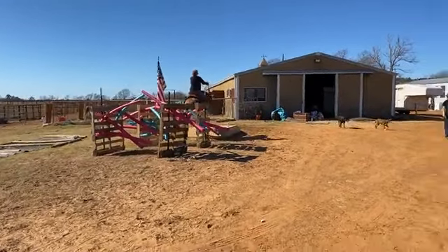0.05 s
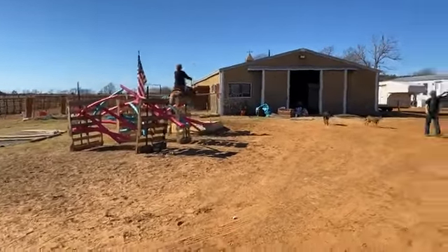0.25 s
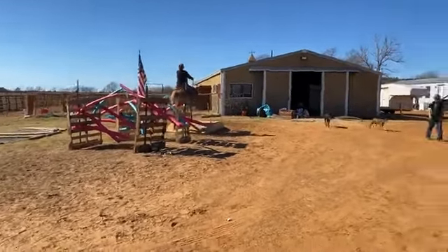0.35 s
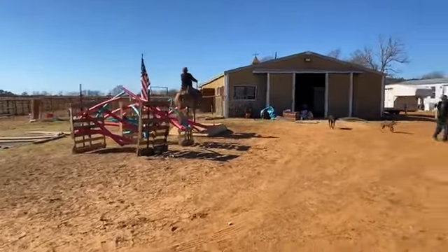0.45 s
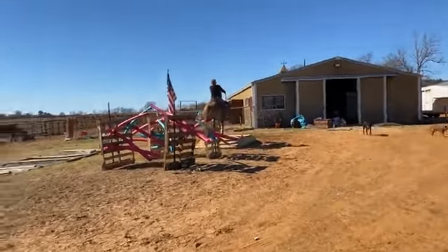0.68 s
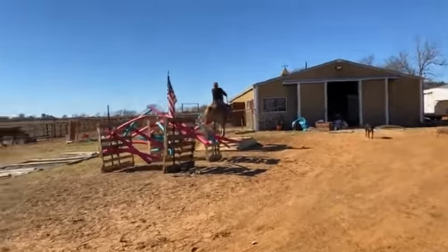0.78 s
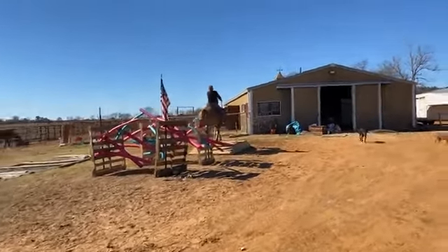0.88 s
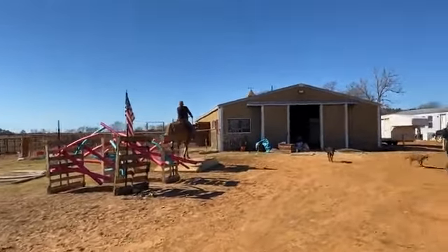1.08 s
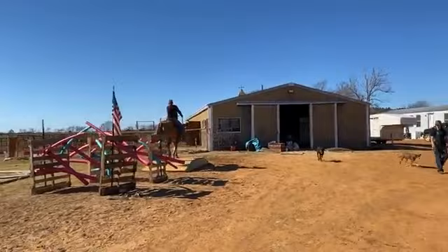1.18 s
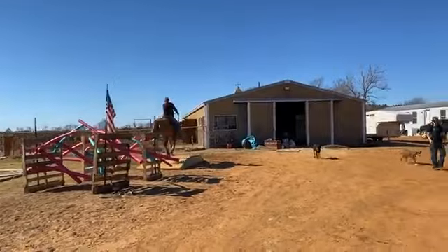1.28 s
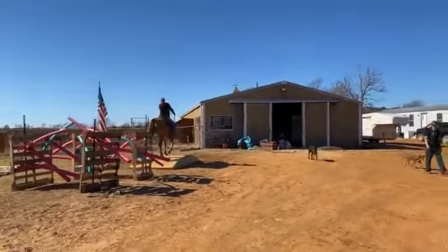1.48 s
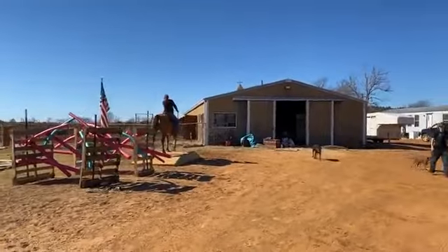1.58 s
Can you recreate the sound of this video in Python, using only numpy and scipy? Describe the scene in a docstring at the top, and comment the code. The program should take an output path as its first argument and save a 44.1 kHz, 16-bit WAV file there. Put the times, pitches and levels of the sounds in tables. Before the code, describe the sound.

Hollow hoof knocks on wooden planks as a horse walks over a low bridge.

```python
"""Horse on a wooden bridge

A horse walks over a low wooden bridge in an open ranch yard, some way off. Each hoof clacks on a
plank, then its weight sets the hollow deck booming; the boom lingers and scatters round the yard.
Close by, grit ticks and sand scuffs and rustles over a faint rumble of outdoor air."""
import sys
import numpy as np
from scipy import signal
from scipy.fft import rfft, irfft
from scipy.io import wavfile

SR = 44100
rng = np.random.default_rng(int(sys.argv[2]) if len(sys.argv) > 2 else 0)


def output_pcm(signal):
    """Save a mono or channel-first signal as 16-bit PCM at the path in sys.argv[1].

    Samples are clipped to [-1, 1] before scaling.
    """
    pcm = np.clip(np.atleast_2d(signal).T, -1, 1) * 32767
    wavfile.write(sys.argv[1], SR, np.round(pcm).astype(np.int16))


N = 72765
T = np.arange(N) / SR
SAND_GRAIN_DB = 2.0   # fast level flicker that makes sand sound grainy


def from_db(db):
    """Decibels to gain."""
    return 10 ** (np.asarray(db) / 20)


def rms_one(x):
    """Scale to rms 1."""
    return x / np.sqrt(np.mean(x ** 2) + 1e-20)


def peak_one(x):
    """Scale to peak 1."""
    return x / (np.abs(x).max() + 1e-20)


def noise(spectrum):
    """Noise at rms 1, coloured by rows of (frequency [Hz], level [dB])."""
    hz, db = np.transpose(spectrum)
    bins_hz = np.maximum(np.fft.rfftfreq(N, 1 / SR), 1)
    gain = from_db(np.interp(np.log(bins_hz), np.log(hz), db))
    return rms_one(irfft(rfft(rng.standard_normal(N)) * gain, N))


def drift(rate_hz):
    """Random wobble at rms 1, mostly slower than the given rate."""
    rolloff = 1 + (np.fft.rfftfreq(N, 1 / SR) / rate_hz) ** 2
    return rms_one(irfft(rfft(rng.standard_normal(N)) / rolloff, N))


def fade(t60):
    """Exponential decay, 60 dB down after t60 seconds."""
    return np.exp(-np.log(1000) * T / t60)


def rise(s):
    """Smooth attack over about s seconds."""
    return 1 - np.exp(-(T / s) ** 2)


def at(s, x):
    """Delay a sound to its cue."""
    return np.concatenate([np.zeros(max(int(s * SR), 0)), x])[:N]


def focus(hz, centre_hz, octaves):
    """Bell-shaped gain: where and how a hoof lands favours the range round one pitch."""
    return 1 / (1 + (np.log2(hz / centre_hz) / octaves) ** 2 / 2) ** 2


def shape(order, place):
    """How strongly a mode moves at the place that is struck."""
    return np.sin(order * np.pi * place)


def ring(modes):
    """Struck modes as dying sines, from rows of (frequency [Hz], gain, t60 [s])."""
    return sum(g * np.sin(2 * np.pi * hz * T) * fade(t60) for hz, g, t60 in modes)


def deck_thuds():
    """The horse's weight loads the deck: it rings low, shudders and leaves a diffuse boom in the yard."""
    # footfalls: (time [s], level [dB], focus [Hz], spread [octaves], ring length [factor],
    # place along the deck [0-1], boom level [dB])
    thuds = [(0.2345, -13, 154, 0.56, 0.96, .769, -34.5), (0.2859, -16.5, 118, 0.72, 0.31, 0.58, -45.5),
             (0.598, -34.5, 166, 0.88, 1.33, 0.25, -51.5), (0.6142, -28.5, 143, 0.85, 1.01, 0.48, -52),
             (0.746, -39.5, 140, 0.44, 0.69, 0.53, -63.5), (0.824, -45, 210, 0.68, 0.37, 0.38, -44.5),
             (0.8332, -19.5, 204.6, 0.36, 0.78, 0.2, -48), (1.2045, -35, 209, 0.56, 0.92, 0.75, -63),
             (1.231, -35, 175, 0.88, 0.75, .28, -72), (1.4103, -35.5, 73.4, 0.56, 0.93, 0.59, -54.5),
             (1.5023, -34.5, 89, 0.77, .52, 0.45, -64), (1.5885, -39, 246, 0.78, 0.95, 0.92, -41.5),
             (1.622, -36, 139, 1.08, 0.31, .27, -44)]
    # modes of the whole deck, in order: (frequency [Hz], level [dB], t60 [s])
    deck_modes = [(79, -12, 0.69), (105.97, -3, 0.51), (133.26, -2.76, 0.36), (155.8, 1.7, 0.51),
                  (193.4, -1.5, 0.18), (215.9, -4.5, 0.28), (254, -13, 0.52), (280, 4.5, .24),
                  (332.4, 0, 0.11), (379.6, 3, 0.14)]
    # colour of shudder and boom: (frequency [Hz], level [dB])
    boom_spectrum = [(30, -39.5), (55, -20.5), (80, -17.5), (115, -0.5), (165, -6), (270, -12.5),
                     (380, -15.5), (480, -26.5), (900, -74.5)]
    out = np.zeros(N)
    for s, db, centre_hz, octaves, length, place, boom_db in thuds:
        body = ring([(hz, from_db(d) * shape(k, place) * focus(hz, centre_hz, octaves), t60 * length)
                     for k, (hz, d, t60) in enumerate(deck_modes, 1)])
        colour = [(hz, d + 10 * np.log10(focus(hz, centre_hz, 2 * octaves))) for hz, d in boom_spectrum]
        shudder = from_db(-24.5) * noise(colour) * fade(t60=0.16)   # the hoof settles on the boards
        thud = from_db(db) * (body + shudder) * rise(s=0.0053)   # the weight builds up
        boom = from_db(boom_db) * noise(colour) * rise(s=0.01) * fade(t60=0.62)
        out += at(s, thud + boom)
    return out


def plank_clacks():
    """Hoof wall hits plank: the wood rings, crushed sand cracks and shakes it, the yard scatters it."""
    # hoof hits: (time [s], level [dB], focus [Hz], spread [octaves], place along the plank [0-1],
    # ring length [factor])
    clacks = [(0.2336, -27, 1295, 0.82, .19, 0.8), (0.2857, -40, 570, 0.44, 0.25, 0.83),
              (0.5946, -32.5, 731, 1.2, 0.19, 0.86), (0.6116, -25.5, 795, 0.45, 0.24, 0.8),
              (0.823, -45.5, 1540, 1.6, 0.19, 0.82), (0.837, -34, 1380, 1.24, .55, 0.84),
              (1.1953, -42, 980, 1.1, 0.23, 1.15), (1.4271, -36.5, 590, 0.42, 0.3, 0.55),
              (1.483, -45, 900, 1.5, 0.51, 0.65), (1.514, -47.5, 484, 0.36, 0.32, 0.59),
              (1.553, -51, 970, 1.1, 0.24, 0.62), (1.586, -34.5, 614, 1.5, 0.47, 1.2),
              (1.590, -31.5, 520, 1.34, .49, 0.64)]
    # modes of one plank, in order: (frequency [Hz], level [dB], t60 [s])
    plank_modes = [(439.5, -6, 0.11), (530, -9, 0.1), (588.2, 1, 0.098), (630, -8.5, 0.072),
                   (806, -6, 0.05), (895, -1, 0.071), (967.5, -5.5, 0.085), (1125, -1.5, 0.023),
                   (1186, -6.5, 0.039), (1396, -12, 0.076), (1733, -12, 0.11), (2302, -5, .04),
                   (2660, -17.5, 0.016), (3230, -17, .028), (3354, -11, 0.052)]
    # colour of sand crushed under the hoof: (frequency [Hz], level [dB])
    crack_spectrum = [(200, -29.5), (400, -14), (750, -9.5), (1100, 4.5), (1550, -11.5), (2400, -2),
                      (4300, -10.5), (6500, -22.5), (15000, -35.5)]
    out = np.zeros(N)
    for s, db, centre_hz, octaves, place, length in clacks:
        modes = [(hz, from_db(d) * abs(shape(k, place)) * focus(hz, centre_hz, octaves), t60 * length)
                 for k, (hz, d, t60) in enumerate(plank_modes, 1)]
        wood = peak_one(ring(modes))
        woody_noise = rms_one(irfft(rfft(wood) * rfft(rng.standard_normal(N)), N))
        colour = [(hz, d + 10 * np.log10(focus(hz, centre_hz, octaves))) for hz, d in crack_spectrum]
        crack = from_db(-19) * noise(colour) * fade(t60=0.039)
        grind = from_db(-14.5) * woody_noise * fade(t60=0.047)   # grains shake the plank
        clack = (wood + crack + grind) * rise(s=0.0012)
        scatter = from_db(-29) * woody_noise * rise(s=0.017) * fade(t60=0.4)
        out += at(s, from_db(db) * (clack + scatter))
    return out


def grit_ticks():
    """Grit of different sizes snaps, close and dry: a tiny ring with a burst of noise."""
    # ticks: (time [s], level [dB], tilt [dB/octave], pitch [factor])
    ticks = [(0.0304, -40.5, -6, 0.98), (0.0465, -52, 7, 1.11), (0.055, -51.5, 0, 0.336),
             (0.074, -57, -6, 0.49), (0.0921, -40.5, -5, 0.98), (0.109, -48.5, -5.5, 1.1),
             (0.133, -53, -2.5, .33), (0.1381, -44, -5, 1.07), (0.1486, -47, 4, 0.49),
             (0.161, -58, -1.5, 0.9), (0.275, -45.5, -4, 0.96), (0.345, -66, 0, 1.03),
             (1.333, -39, 1, 0.65), (1.3331, -37, 4.5, 0.92), (1.345, -53, 6, 0.89),
             (1.366, -49.5, 2, 0.95), (1.5067, -49, -2, 1.1)]
    # modes of a tick: (frequency [Hz], level [dB], t60 [s])
    grit_modes = [(635, -13.5, 0.018), (1250, -4.5, .022), (1836, -7.5, 0.022), (2960, 0.5, 0.0041),
                  (4070, -4, 0.012), (4900, -2.5, 0.012), (5940, -22, 0.0055), (7100, 2.5, .005),
                  (8370, 4, 0.0049), (9600, -8, .003), (15270, -19.5, 0.002)]
    lowest_hz = grit_modes[0][0]
    out = np.zeros(N)
    for s, db, tilt_db, pitch in ticks:
        modes = [(hz * pitch, d + tilt_db * np.log2(hz / lowest_hz), t60) for hz, d, t60 in grit_modes]
        tick = ring([(hz, (-1) ** k * from_db(d + rng.normal(0, 0.5)), t60)
                     for k, (hz, d, t60) in enumerate(modes)])
        snap = from_db(-10) * noise([(hz, d) for hz, d, _ in modes]) * fade(t60=0.012)
        out += at(s, from_db(db) * (peak_one(tick) + snap))
    return out


def sand_scuffs():
    """Sand dragged briefly: a grainy hiss that swells, holds and stops."""
    # scuffs: (time [s], level [dB], length [s], centre [Hz], spread [octaves])
    scuffs = [(0.404, -74, 0.094, 2240, 0.38), (1.059, -72.5, 0.027, 4250, 0.7),
              (1.188, -67, 0.09, 2246, 0.078), (1.33, -67, 0.104, 2570, 0.44),
              (1.417, -61.5, 0.026, 1170, 0.86), (1.501, -71, 0.02, 5500, 1.34)]
    edge_s = 0.0042
    hz = np.geomspace(100, 16000, 120)
    out = np.zeros(N)
    for s, db, length, centre_hz, octaves in scuffs:
        colour = np.c_[hz, 20 * np.log10(focus(hz, centre_hz, octaves))]
        hiss = noise(colour) * from_db(SAND_GRAIN_DB * drift(rate_hz=200))
        release = np.exp(-np.maximum(T - length, 0) / edge_s)
        out += at(s, from_db(db) * hiss * rise(edge_s) * release)
    return out


def yard_bed():
    """A low, lightly fluttering rumble of outdoor air under a fine rustle of sand."""
    # colour of the air: (frequency [Hz], level [dB])
    air_spectrum = [(20, -29), (40, -18.5), (65, -2.5), (95, 0), (180, -3), (300, -12.5), (500, -22.5),
                    (1100, -26), (1600, -36), (2500, -38), (5000, -46), (16000, -57)]
    # colour of the sand: (frequency [Hz], level [dB])
    sand_spectrum = [(300, 13), (1000, 6), (1550, -2), (2350, 4), (2700, 2.5), (4000, -4), (6000, -9),
                     (9000, -8.5), (11000, -16), (16000, -12.5)]
    # swells of the rustle: (time [s], level [dB])
    rustle_curve = [(0, -67.5), (.16, -87.5), (.22, -72.5), (.46, -75), (.55, -80.5), (.76, -71),
                    (.93, -71), (1.07, -70), (1.15, -72.5), (1.21, -62.5), (1.32, -63.5), (1.42, -64.5),
                    (1.47, -65), (1.51, -64), (1.57, -68.5), (1.65, -67)]
    air_db, flutter_db = -55.5, 1.0
    air = noise(air_spectrum) * from_db(air_db + flutter_db * drift(rate_hz=5.8))
    rustle_db = np.interp(T, *np.transpose(rustle_curve))
    sand = noise(sand_spectrum) * from_db(rustle_db + SAND_GRAIN_DB * drift(rate_hz=190))
    return air + sand


def scene():
    """Bridge, grit, sand and yard, mixed in mono."""
    return (deck_thuds() + plank_clacks() + grit_ticks() + sand_scuffs() + yard_bed())[None]


def record(dry):
    """The small microphone loses the deep bass; the top is cut steeply."""
    low_cut_hz, high_cut_hz = 34, 15800
    low_cut = signal.butter(2, low_cut_hz, "high", fs=SR, output="sos")
    high_cut = signal.ellip(10, 0.2, 70, high_cut_hz, fs=SR, output="sos")
    return signal.sosfilt(high_cut, signal.sosfilt(low_cut, dry))


dry = scene()
out = record(dry)
output_pcm(out)
```